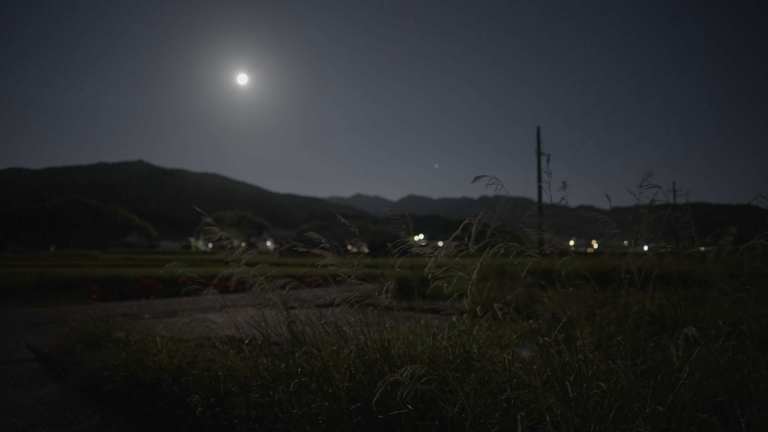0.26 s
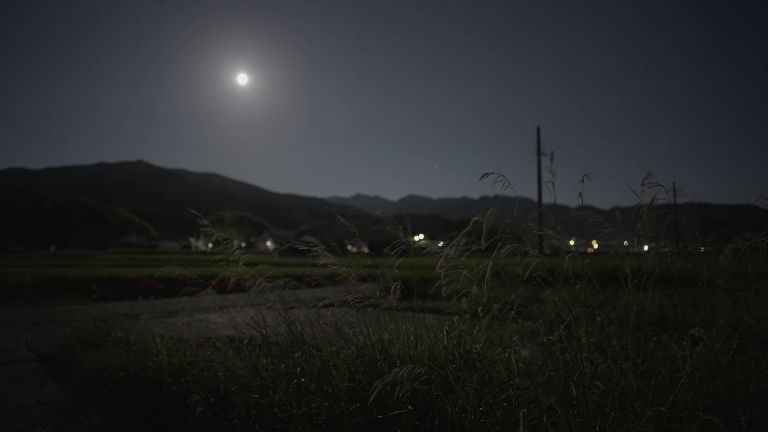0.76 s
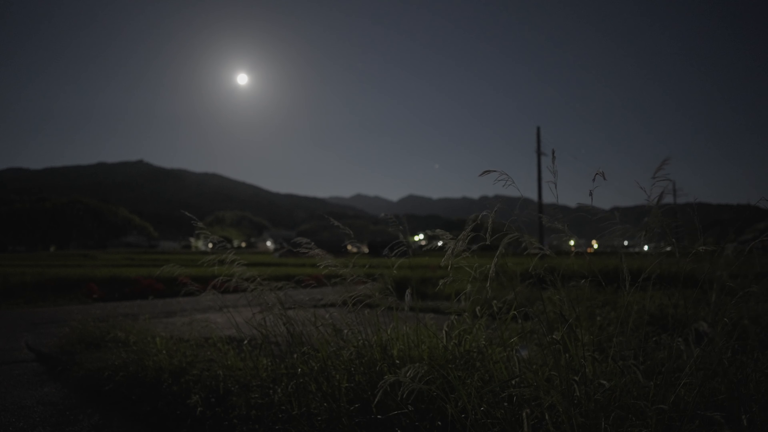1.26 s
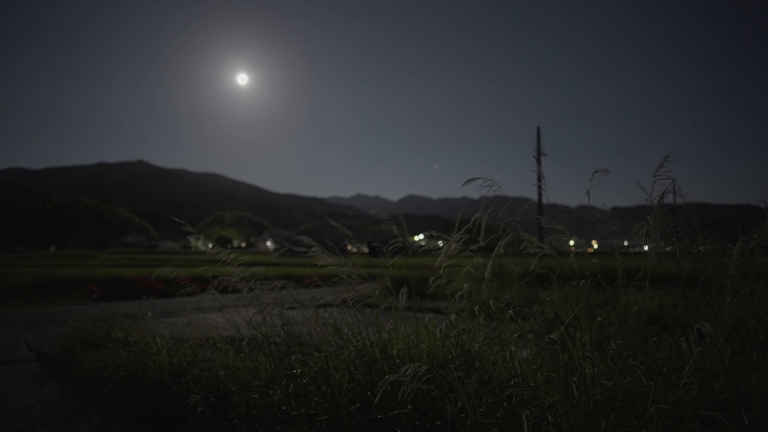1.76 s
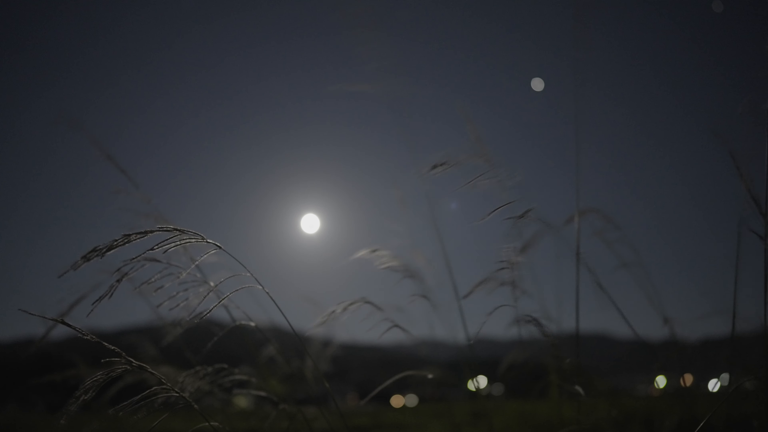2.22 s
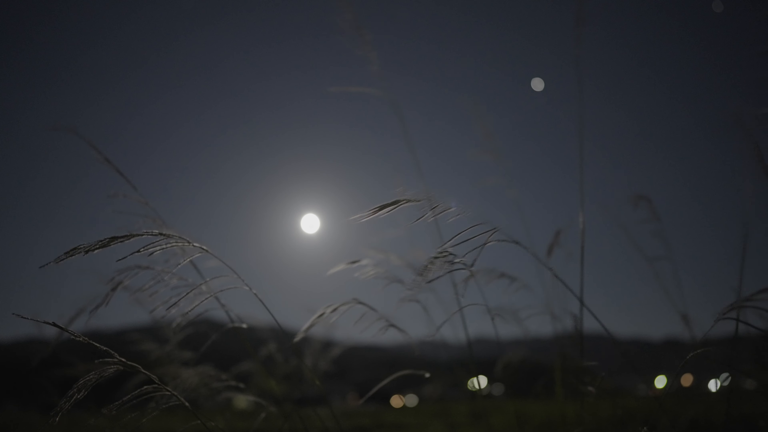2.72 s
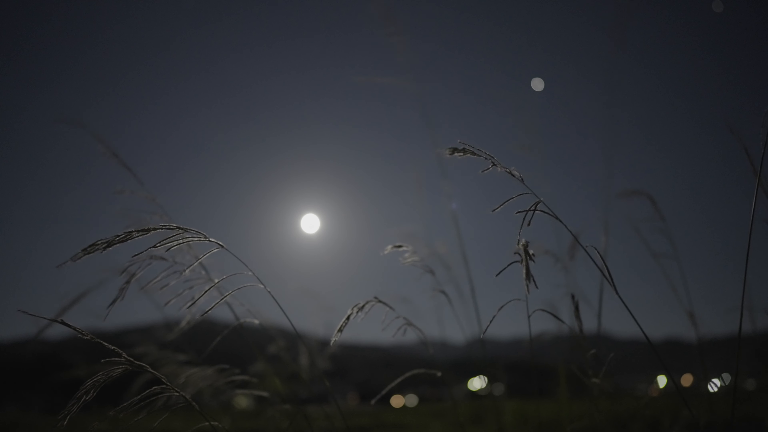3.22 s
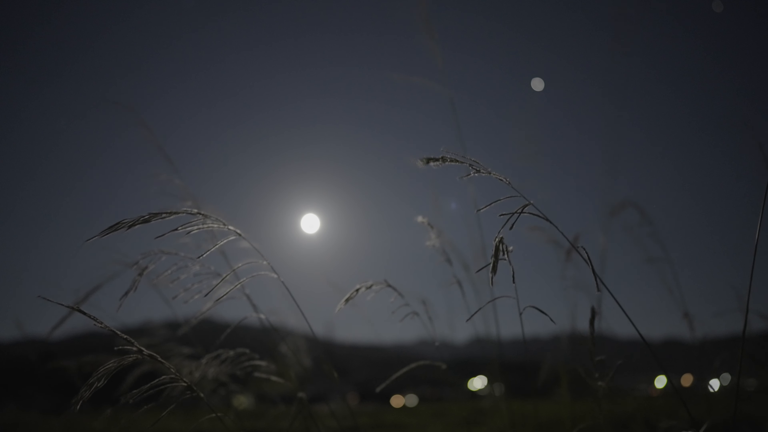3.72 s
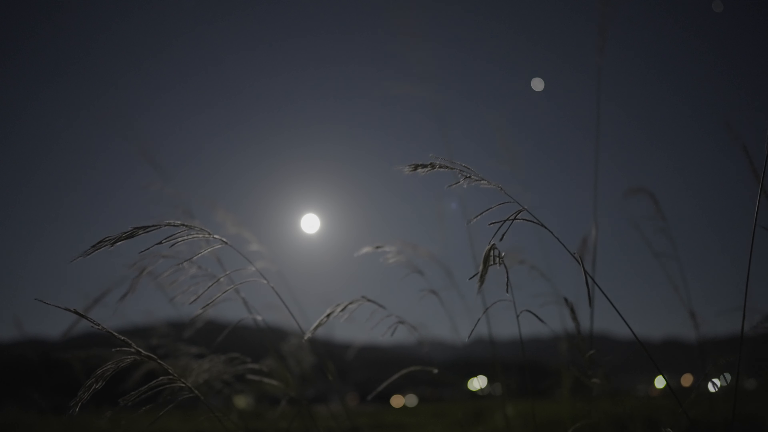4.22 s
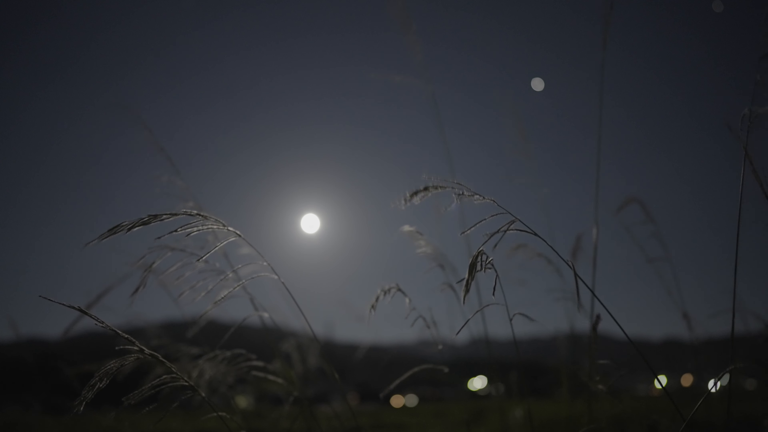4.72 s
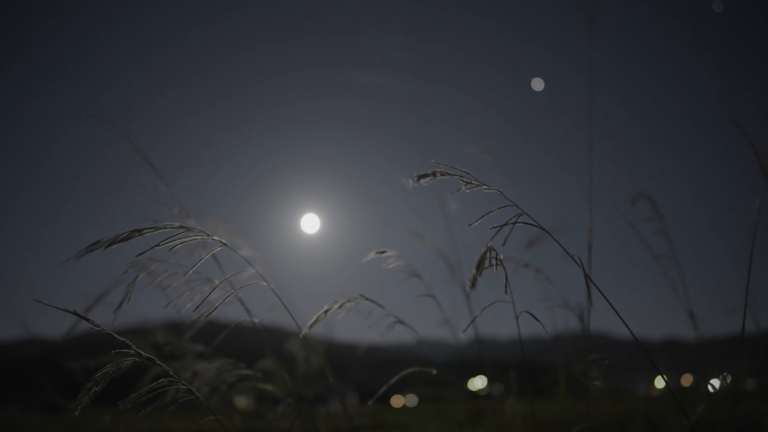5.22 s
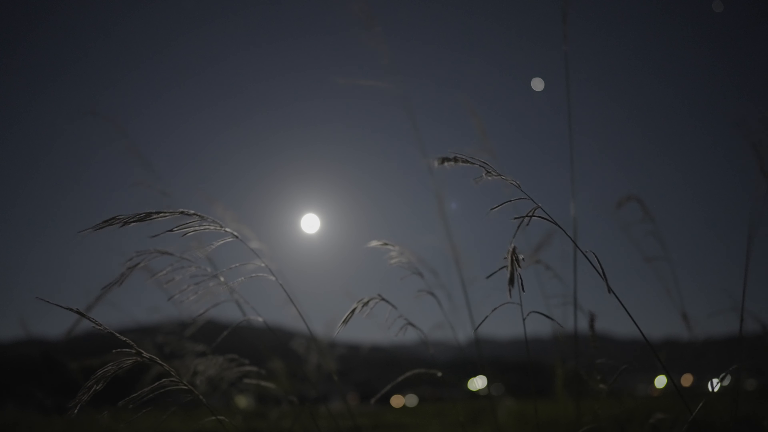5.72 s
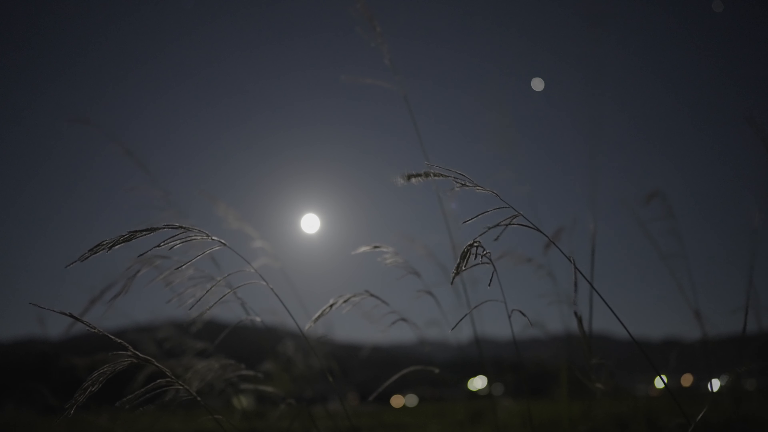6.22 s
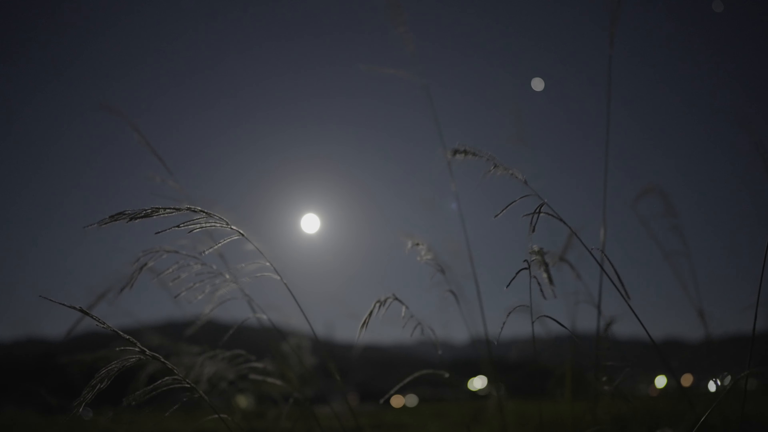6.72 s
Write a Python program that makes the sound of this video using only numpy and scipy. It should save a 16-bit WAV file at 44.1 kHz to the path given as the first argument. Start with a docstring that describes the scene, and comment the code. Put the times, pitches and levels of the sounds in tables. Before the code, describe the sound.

Overlapping cricket trills fill a night field; nearby chirps ring out, then a lower, regular rolling trill joins, with faint water drips beneath.

```python
"""Night field of crickets

Field crickets close to the microphone sing falling, bell-like notes; from the middle on one rolls its strokes
into swelling phrases. Farther off are a field chorus, a high trilling chorus with a dry buzz, two ground crickets
and a rasping katydid. The singers are swept tones or pulsed noise, the ditch is ringing bubbles over a soft rush,
and the breeze at the microphone is low, uneven noise under a faint hiss."""
import sys
import numpy as np
from scipy import signal
from scipy.fft import rfft, irfft, next_fast_len
from scipy.io import wavfile
from scipy.ndimage import map_coordinates

SR = 44100
rng = np.random.default_rng(int(sys.argv[2]) if len(sys.argv) > 2 else 0)


def bounce(signal):
    """Save signal as a 16-bit WAV file at the path given by the first command-line argument."""
    frames = np.transpose(np.atleast_2d(signal))
    limited = np.clip(frames, -1, 1)
    pcm = np.round(limited * 32767).astype(np.int16)
    wavfile.write(sys.argv[1], SR, pcm)


N = 306936  # length in samples


def amp(db):
    """Decibels to gain."""
    return 10 ** (np.asarray(db) / 20)


def unit(x):
    """x at rms 1."""
    return x / np.sqrt(np.mean(x ** 2) + 1e-20)


def wobble(rate):
    """A smooth random curve with rate knots a second."""
    knots = rng.standard_normal(4096)
    return map_coordinates(knots, [np.arange(N) * rate / SR], mode="wrap")


def filtered(x, response):
    """x times a response of frequency, applied to its spectrum."""
    padded = next_fast_len(N + 8192)
    spectrum = rfft(x, padded) * response(np.fft.rfftfreq(padded, 1 / SR))
    return irfft(spectrum, padded)[:N]


def coloured(x, tone):
    """x shaped by (frequency_hz, level_db) points joined over log frequency, at rms 1."""
    f, db = np.transpose(tone)
    return unit(filtered(x, lambda hz: amp(np.interp(np.log(hz + 1), np.log(f), db))))


def add(track, s, sound):
    """Mix a sound into the track from s seconds on, cut to the track's ends."""
    start = round(s * SR)
    a, b = max(start, 0), min(start + len(sound), N)
    if b > a:
        track[a:b] += sound[a - start:b - start]


def stroke(hz, length, fall_hz, overtone=0, bend=0):
    """One wing stroke: the scraper slows along the file, so the tone swells, falls and fades."""
    u = np.linspace(-.5, .5, max(int(length * SR), 8))
    pitch = hz - fall_hz * (u + bend * u * u)  # bend steepens the fall towards the end
    phase = 2 * np.pi * (rng.random() + np.cumsum(pitch) / SR)
    swell = np.abs(np.cos(np.pi * u)) ** 1.5
    return swell * (np.sin(phase) + overtone * np.sin(2 * phase))


def wingbeat(rate, drift):
    """Place within the wing cycle (0-1), at a slightly unsteady rate in Hz."""
    return (rng.random() + np.cumsum(rate * (1 + drift * wobble(3))) / SR) % 1


def trill(hz, rate, fall_hz, waver_hz):
    """An unbroken run of quick falling strokes, rms 1; the wing starts ringing afresh with each."""
    u = wingbeat(rate, drift=.005)
    which = np.cumsum(np.diff(u, prepend=u[0]) < 0)  # number of the stroke at every sample
    start, tune = rng.random(N)[which], rng.standard_normal(N)[which]
    pitch = hz - fall_hz * (u - .5) + waver_hz * tune
    tone = np.sin(2 * np.pi * (start + np.cumsum(pitch) / SR))
    return unit(np.sin(np.pi * u) ** 2 * tone)


def bouts(rows, rise_s):
    """Gain of an insect that swells into each (start_s, stop_s) trill and breaks off at its end."""
    t = np.arange(N) / SR
    stop_fade_s = .05
    return sum(np.clip((t - start) / rise_s, 0, 1) * np.clip((stop - t) / stop_fade_s, 0, 1)
               for start, stop in rows)


def bubble(hz, cycles, rise):
    """A bubble rings from hz upwards and dies away; rise is the share of hz gained by u = 1, halfway."""
    u = np.arange(int(2 * cycles / hz * SR)) * hz / (cycles * SR)
    ring = np.sin(2 * np.pi * cycles * (u + rise * u * u / 2))
    return (1 - np.exp(-12 * u)) * np.exp(-3 * u) * ring


def scatter(x, t60, wet_db, count=24):
    """Swaying grass sends back a short diffuse tail that keeps changing."""
    t = np.arange(SR // 4) / SR
    out = x.copy()
    for part in np.array_split(np.arange(N), count):
        tail = rng.standard_normal(len(t)) * amp(-60 * t / t60)
        # each tail hears a window that overlaps the next by half
        span = np.arange(part[0], min(part[0] + 2 * len(part), N))
        heard = x[span] * np.sin(np.pi * np.arange(len(span)) / (2 * len(part)))
        reply = signal.fftconvolve(heard, tail / np.linalg.norm(tail))
        add(out, part[0] / SR, amp(wet_db) * reply)
    return out


def near_crickets():
    """Chirps of falling notes that swell and ebb; each note beats against its echo off nearby stalks."""
    # chirps close by, each a run of evenly spaced wing strokes:
    # first_stroke_s (its middle), strokes (count), spacing_s, pitch_hz (mid-stroke), level_db, stroke_length_s
    chirps = [(0.036, 2, 0.051, 3330, -36.5, 0.029), (0.188, 2, .048, 3370, -35, 0.028),
              (0.339, 2, 0.054, 3335, -37, 0.034), (0.498, 2, 0.054, 3366, -37, 0.042),
              (0.5, 4, 0.083, 3890, -46, .04), (0.612, 7, 0.082, 3600, -35, 0.035),
              (0.673, 2, .118, 3360, -36.5, 0.042), (1.378, 2, 0.088, 3880, -40.5, 0.048),
              (1.494, 4, 0.074, 3763, -29.5, .049), (1.802, 1, .05, 3860, -35, .04),
              (1.866, 3, 0.045, 3710, -33.5, .04), (2.054, 3, 0.043, 3695, -32.5, 0.038),
              (2.045, 3, .157, 3850, -42, 0.04), (2.287, 3, 0.15, 3650, -32, 0.036),
              (2.689, 1, .05, 3850, -36, 0.036), (2.712, 2, 0.15, 3350, -31, .032),
              (2.739, 4, 0.074, 3765, -29, 0.048), (3.008, 1, 0.055, 3521, -37, 0.074),
              (3.059, 4, 0.12, 3390, -35, 0.048), (3.098, 4, 0.051, 3675, -30, .034),
              (3.338, 3, .051, 3650, -33.5, 0.0552), (3.536, 2, 0.051, 3614, -34.5, 0.047),
              (3.539, 5, 0.098, 3384, -40, 0.063), (3.675, 2, 0.22, 3590, -34.5, 0.039),
              (4.054, 3, 0.14, 3370, -38, .048), (4.97, 1, .05, 3800, -41.5, 0.039),
              (5.242, 1, .05, 3640, -35.5, .04), (5.364, 5, 0.082, 3880, -36, 0.038),
              (5.78, 2, .08, 3790, -39, 0.041), (5.99, 4, 0.12, 3770, -37, 0.046),
              (6.69, 2, 0.095, 3695, -38.5, 0.038), (6.946, 1, .05, 3750, -34.5, 0.043)]
    fall_hz_per_s = 13610
    arch_db, crest = 2, .6  # softening towards a chirp's ends; its loudest place, as a share of its length
    # the octave against the note, the note level below which it weakens, and dB lost per dB below that
    octave_db, octave_from_db, octave_slope = -21, -27.5, 3.9
    out = np.zeros(N)
    for first, strokes, spacing, hz, level_db, length in chirps:
        count = round(strokes)
        for k in range(count):
            db = level_db - arch_db * (2 * ((k + .5) / count - crest)) ** 2
            octave = amp(octave_db + octave_slope * min(db - octave_from_db, 0))
            note = amp(db) * stroke(hz, length, fall_hz_per_s * length, octave, bend=.49)
            start = first + k * spacing - length / 2
            add(out, start, note)
            add(out, start + rng.uniform(.004, .014), amp(-10) * note)
    return scatter(out, t60=.15, wet_db=-12)


def rolling_cricket(growth_db=.1, count=7):
    """Each phrase is a roll of short strokes that grow louder; each lingers on the wing's resonance, then drops."""
    # phrases, about 3.6 a second: last_stroke_s (its middle)
    rolls = [3.002, 3.287, 3.573, 3.848, 4.135, 4.411, 4.663, 4.947, 5.217, 5.502, 5.791, 6.078, 6.354,
             6.639, 6.91]
    last_db, wing_hz = -34, 3574  # typical last stroke; every stroke strays a little in level and pitch
    period_s, length_s, ground_lag_s = .0208, .021, .00272
    out = np.zeros(N)
    for s in rolls:
        for back, (size, tune) in enumerate(rng.standard_normal((count, 2))):
            level_db = last_db - growth_db * back ** 2 + size
            note = amp(level_db) * stroke(wing_hz + 18 * tune, length_s, fall_hz=740, bend=.7)
            start = s - back * period_s - length_s / 2
            add(out, start, note)
            # the bounce off the ground splits every sweep into two bright spots
            add(out, start + ground_lag_s, amp(-8) * note)
    return scatter(out, t60=.12, wet_db=-13)


def far_crickets(count=3600):
    """Field crickets farther off: thousands of short falling notes melt together."""
    # spectrum of the far chorus: frequency_hz, level_db
    field_tone = [(2800, -27), (3150, -14), (3400, -4), (3700, -1.5), (3950, -4.5), (4150, -10.5),
                  (4400, -12), (4800, -26)]
    out = np.zeros(N)
    starts = rng.random(count) * N / SR
    for s, (tune, size, span) in zip(starts, rng.standard_normal((count, 3))):
        hz = 3740 + 520 * np.tanh(tune / 2)
        length_s = .01814 * np.exp(.345 * span)
        add(out, s - .015, amp(size) * stroke(hz, length_s, fall_hz=596))
    level_db = -43 + .14 * wobble(2.12)
    return amp(level_db) * coloured(out, field_tone)


def high_chorus(count=16):
    """Smaller crickets trill near one pitch, each at its own pace; a dry buzz of pulsed noise lies above them."""
    # spectra of the trills and of the buzz: frequency_hz, level_db
    high_tone = [(4200, -2.5), (4600, -20.5), (4900, -8.5), (5150, -2.5), (5380, -7), (5600, -16.5),
                 (5900, -57)]
    buzz_tone = [(5200, -37), (5700, -2), (6050, 3.5), (6500, 2.5), (6900, -1), (7300, -22), (7800, -44)]
    voices = sum(trill(hz, rng.uniform(45, 130), fall_hz=607, waver_hz=120.1)
                 for hz in np.linspace(4750, 5450, count))
    chorus = amp(-45 + .42 * wobble(5)) * coloured(voices, high_tone)
    pulse = 1 + .19 * np.cos(2 * np.pi * wingbeat(111, drift=.009))
    teeth = pulse * rng.standard_normal(N)
    buzz = amp(-60 + .44 * wobble(2.2)) * coloured(teeth, buzz_tone)
    return chorus + buzz


def ground_crickets():
    """Two tiny crickets with very fast wings hold long trills; the thin one grows purer as it climbs to pitch."""
    # long trills of the thin and of the shrill cricket: start_s, stop_s
    thin_trills = [(-4, 1.27), (1.9, 7.2)]
    shrill_trills = [(-.15, 2.27), (2.33, 4.85), (5, 7.2)]
    thin_hz, climb_hz, climb_s = 7184, 1126, 3.35  # pitch reached, how flat a trill starts, time to climb
    t = np.arange(N) / SR
    thin = np.zeros(N)
    for start, stop in thin_trills:
        flat_hz = climb_hz * (1 - np.clip((t - start) / climb_s, 0, 1) ** 1.3)
        song = trill(thin_hz - flat_hz, rate=122, fall_hz=160, waver_hz=41 + .22 * flat_hz)
        thin += amp(-64.5) * bouts([(start, stop)], rise_s=.046) * song
    song = trill(8840, rate=107, fall_hz=810, waver_hz=48.5)
    shrill = amp(-71.5) * bouts(shrill_trills, rise_s=.3) * song
    return scatter(thin, t60=.15, wet_db=-1) + shrill


def katydid():
    """A toneless rasp, pulsing with each wing stroke; it builds slowly to each crest and ebbs faster."""
    # swells of the rasp: crest_s, level_db
    swell_rows = [(.63, -65), (1.07, -65), (1.59, -64), (2.03, -66), (3.28, -61.5), (3.78, -67),
                  (4.63, -74), (5.55, -66), (5.92, -60), (6.39, -64), (6.84, -65)]
    # spectrum of the rasp: frequency_hz, level_db
    rasp_tone = [(9000, -26), (10500, -11.5), (12000, -2.5), (12900, -1), (13800, -19), (15000, -13),
                 (16000, -2.5)]
    rise_s, fall_s, steady_db = .21, .066, -67.5  # Gaussian spreads of a swell; the rasp under the swells
    t = np.arange(N) / SR
    swells = [amp(db) * np.exp(-((t - s) / np.where(t < s, rise_s, fall_s)) ** 2 / 2) for s, db in swell_rows]
    effort = np.sqrt(amp(steady_db) ** 2 + np.sum(np.square(swells), axis=0))
    beat = 1 + .75 * np.cos(2 * np.pi * wingbeat(33.5, drift=.025))
    unsteady_db = 1.5 * wobble(24)
    return effort * amp(unsteady_db) * coloured(beat * rng.standard_normal(N), rasp_tone)


def ditch(count=2200):
    """A trickle of small ringing bubbles over a soft rush of noise, with a few clear drips."""
    # clear drips: start_s, level_db (relative, raised below), pitch_hz (early in the ring)
    drip_rows = [(0.062, -47, 1960), (0.342, -51.5, 820), (0.552, -43, 1980), (0.989, -53.5, 1124),
                 (1.235, -47.5, 2050), (2.496, -50, 2320), (3.309, -49, 2170), (3.521, -49.5, 1534),
                 (4.02, -48.5, 834), (4.379, -42, 2620), (4.744, -45.5, 2580), (4.787, -54, 798),
                 (4.883, -46.5, 2060), (4.935, -45.5, 2090), (5.095, -49, 2100), (6.259, -46, 927),
                 (6.286, -56, 1026), (6.29, -46, 2320), (6.739, -52, 1540), (6.883, -51, 907)]
    # spectrum of the rush and the babble: frequency_hz, level_db
    water_tone = [(120, -46), (220, -24), (340, -12.5), (480, -3), (600, -1.5), (800, -1.5), (1250, -0.5),
                  (1600, -4), (2000, -5), (2600, -5.5), (3500, 0), (6000, -45)]
    drip_rise = .23
    babble, drips = np.zeros(N), np.zeros(N)
    for s, width, size in rng.random((count, 3)):
        hz = 580 * 5 ** width
        add(babble, s * N / SR, amp(12 * size ** 3) * bubble(hz, cycles=hz * .012, rise=.14))
    for s, db, hz in drip_rows:
        start_hz = hz * (1 - drip_rise / 4)
        add(drips, s, amp(db + 4) * bubble(start_hz, cycles=28.8, rise=drip_rise))
    rush = amp(.43 * wobble(4.5)) * coloured(rng.standard_normal(N), water_tone)
    water = rush + amp(-4) * coloured(babble, water_tone)
    return amp(-60.5) * water + scatter(drips, t60=.14, wet_db=-4.5)


def night_air():
    """A faint even hiss and the breeze's low rumble, which comes in small puffs and a few gusts."""
    # gusts on the microphone: crest_s, level_db, spread_s (Gaussian)
    gust_rows = [(1.376, -78, .04), (1.58, -80, .08), (2.267, -81, 0.16), (3.778, -90, .1),
                 (6.9, -86, .025)]
    # spectra of the hiss and of the rumble: frequency_hz, level_db
    air_tone = [(150, -13), (1500, -7), (4400, 16), (7500, 5), (8300, 6.5), (9700, -2), (10400, 0),
                (14000, 4.5), (15700, -9)]
    rumble_tone = [(18, -26), (32, -5), (52, 0), (95, -2), (150, -11.5), (300, -11.5), (700, -54)]
    t = np.arange(N) / SR
    breeze = amp(-84 - 1.4 * t)  # dies down steadily, in dB per second
    gusts = sum(amp(db) * np.exp(-((t - s) / spread) ** 2 / 2) for s, db, spread in gust_rows)
    puffs_db = 3 * wobble(16)
    rumble = (breeze + gusts) * amp(puffs_db) * coloured(rng.standard_normal(N), rumble_tone)
    hiss = amp(-57) * coloured(rng.standard_normal(N), air_tone)
    return rumble + hiss


def scene():
    """All the singers over the ditch and the air, on one channel."""
    near = near_crickets() + rolling_cricket()
    farther = far_crickets() + high_chorus() + ground_crickets() + katydid()
    return (near + farther + ditch() + night_air())[None]


def record(dry):
    """The microphone's channel passes nothing above its band limit."""
    top_hz = 15720
    return np.array([filtered(channel, lambda hz: hz < top_hz) for channel in dry])


dry = scene()
out = record(dry)
bounce(out)
```